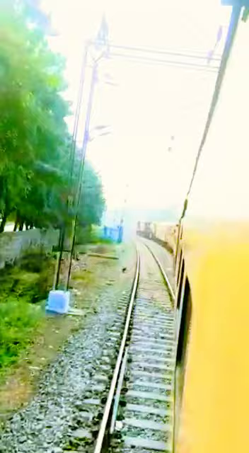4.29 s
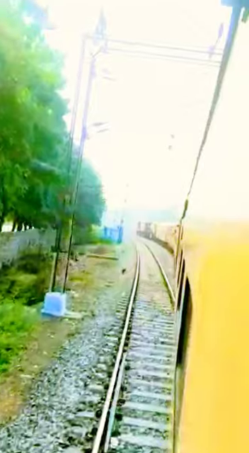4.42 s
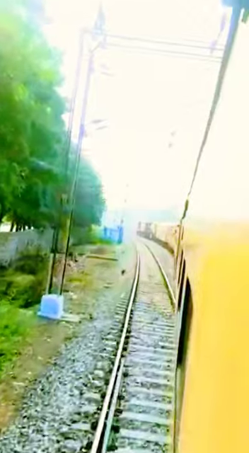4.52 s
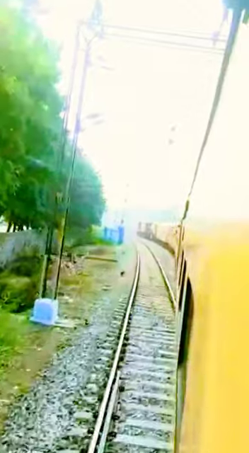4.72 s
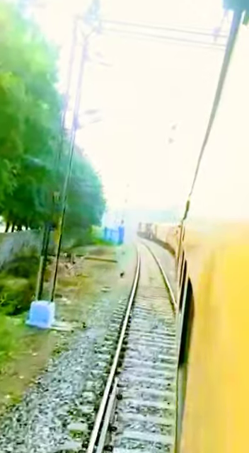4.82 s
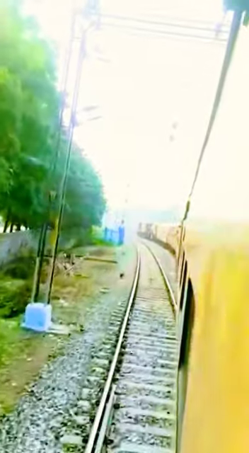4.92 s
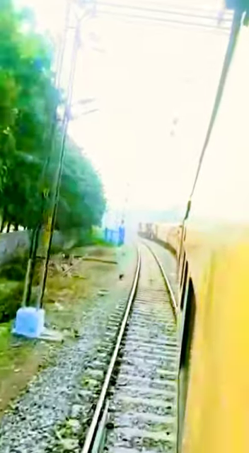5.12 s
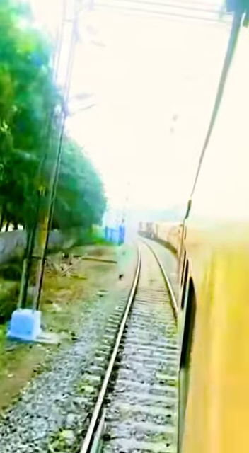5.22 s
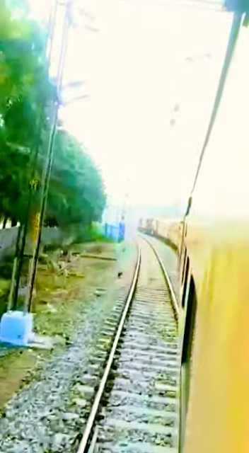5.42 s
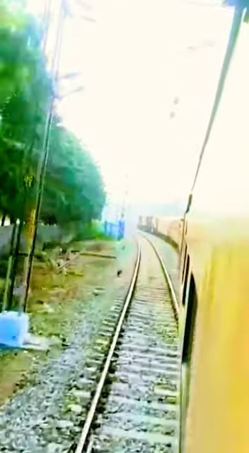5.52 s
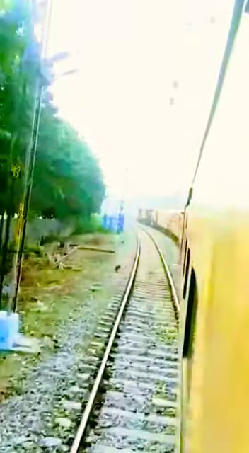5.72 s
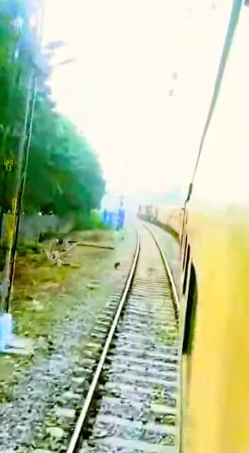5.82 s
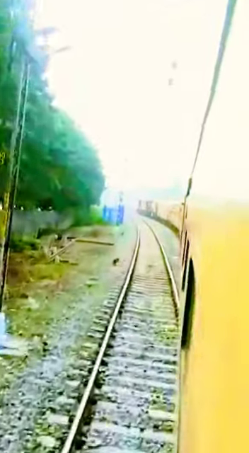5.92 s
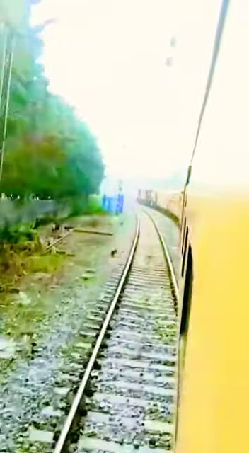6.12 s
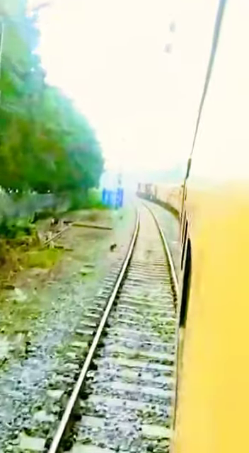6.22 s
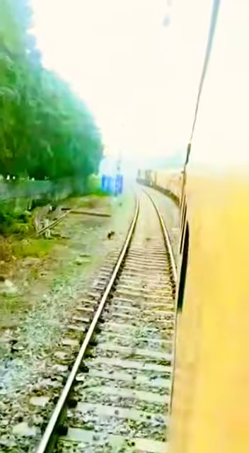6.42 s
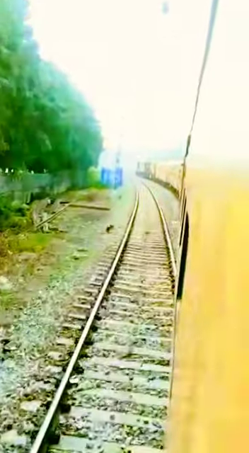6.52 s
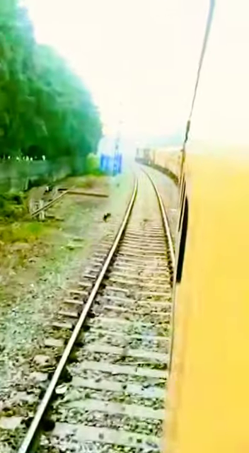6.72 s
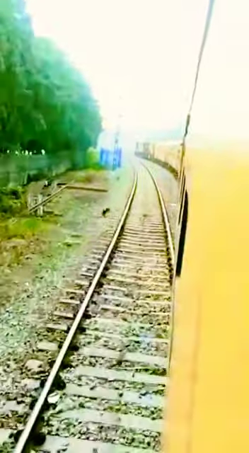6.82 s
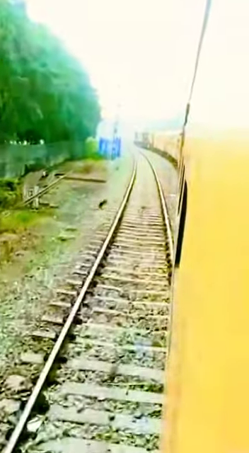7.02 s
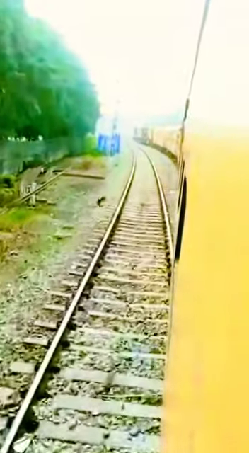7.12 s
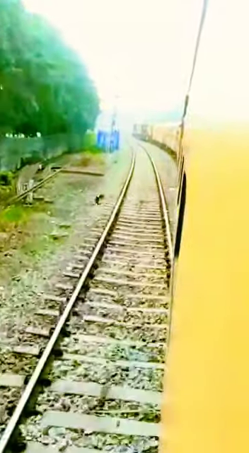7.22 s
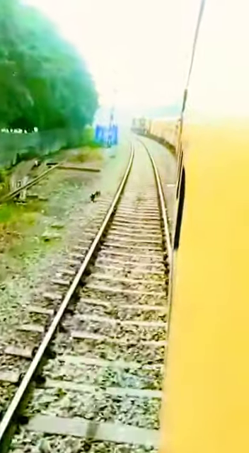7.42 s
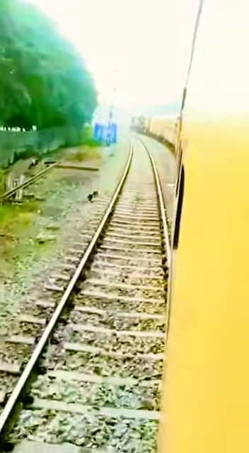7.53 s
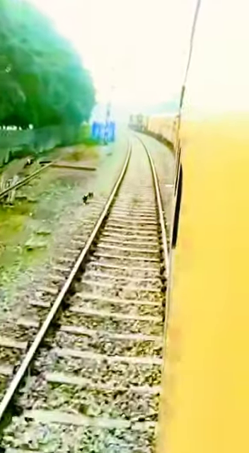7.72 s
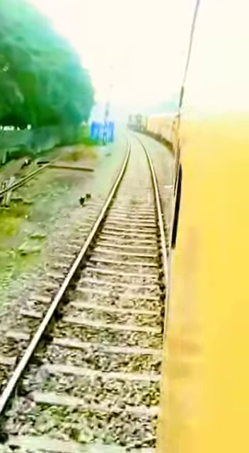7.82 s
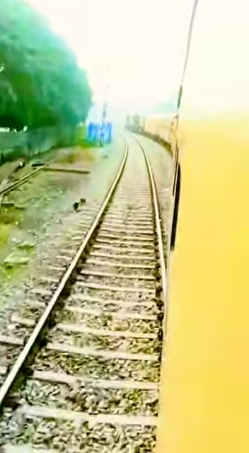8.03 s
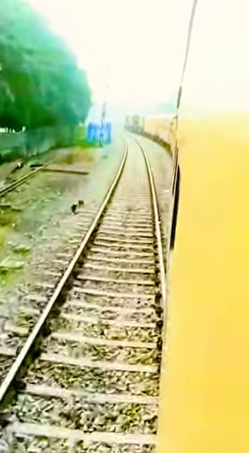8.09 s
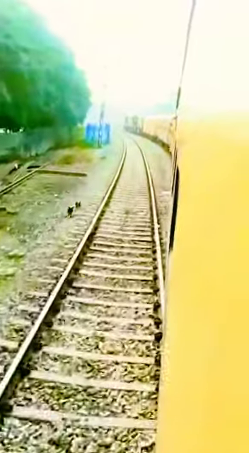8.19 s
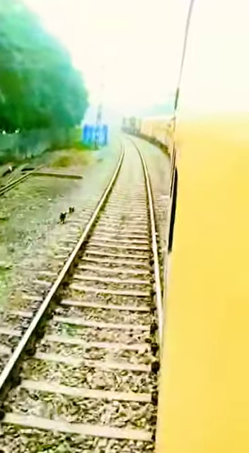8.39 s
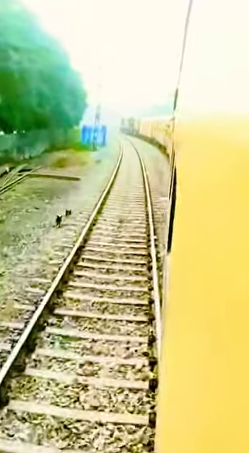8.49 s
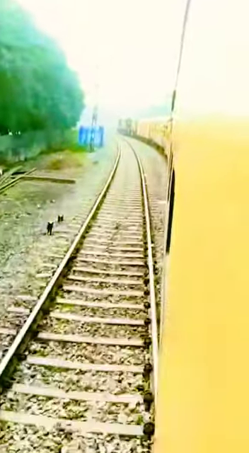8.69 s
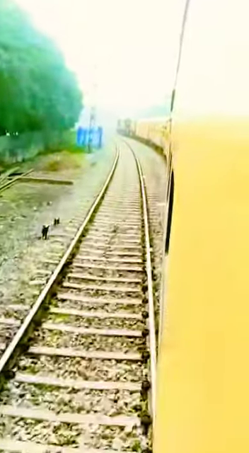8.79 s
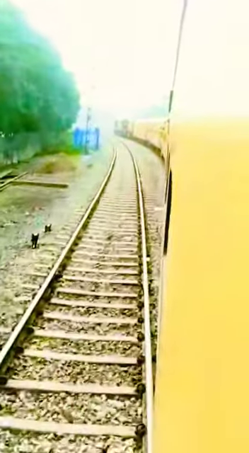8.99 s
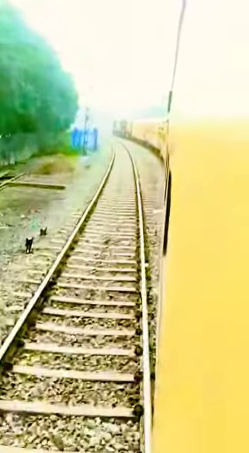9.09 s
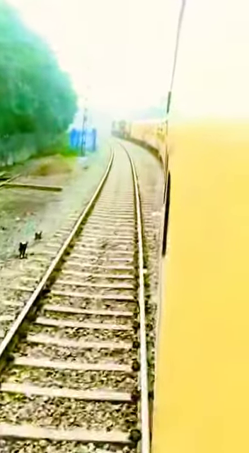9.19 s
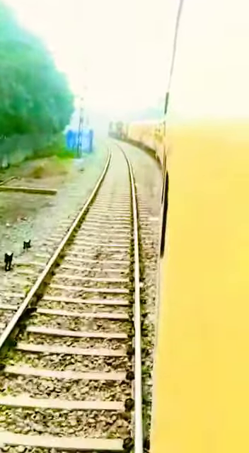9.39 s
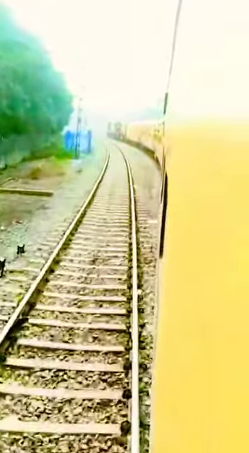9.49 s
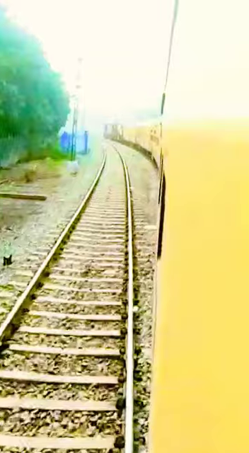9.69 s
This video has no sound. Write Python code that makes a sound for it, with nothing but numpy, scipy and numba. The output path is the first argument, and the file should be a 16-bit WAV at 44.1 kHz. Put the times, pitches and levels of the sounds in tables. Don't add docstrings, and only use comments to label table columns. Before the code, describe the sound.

At the open doorway of a slowly rolling passenger coach, a low, uneven wheel rumble, droning floor panels, mid roar and soft hiss continue throughout. Over them a thin flange squeal near 2 kHz, with overtones, flutters as it grips and slips, beside very faint steady electrical whines. A sharp bang with rattling metal lands at 0.5 s, then scattered knocks at 1.3, 1.7, 2.5, 3.3 and 3.8 s, with dull thuds and tiny scrapes between. Another knock comes at 4.6 s, then a short lull before 5.6 s. From about 6 s the ride roughens: heavy clanks at 6.3, 7.0 and 7.8 s, crowded thuds, chattering and jingling loose parts. Blows continue at 8.4 and 9.0 s, then soften towards 9.7 s as rumble and squeal persist. Close stereo sound, right side duller, hard peaks slightly squashed.

```python
import sys
import numpy as np
from scipy import signal
from scipy.fft import rfft, irfft
from scipy.io import wavfile
from scipy.ndimage import uniform_filter1d
from numba import njit

SR = 44100
rng = np.random.default_rng(int(sys.argv[2]) if len(sys.argv) > 2 else 0)


def wrap_up_sound(samples):
    columns = np.atleast_2d(samples).T
    tamed = np.clip(columns, -1, 1)
    steps = np.round(tamed * 32767).astype(np.int16)
    wavfile.write(sys.argv[1], SR, steps)


def boost(x):
    u = np.asarray(x, float) / 20
    return 10 ** u


N = 429975
HZ = np.fft.rfftfreq(N, 1 / SR)

# start_s, peak_db, boom_re_peak_db, clank_db, t60_s
JOINT_BLOWS = [(0.498, -5, -10.5, -20.5, 0.21), (1.275, -11.5, -0.5, -30, 0.092),
               (1.701, -14.5, -12, -26.5, 0.35), (2.461, -18.5, -22, -29.5, 0.31),
               (3.259, -19.5, -11, -35, 0.12), (3.809, -17.5, -1, -38, 0.2),
               (3.839, -15.5, -15, -30.5, 0.42), (4.573, -11.5, -2.5, -39, 0.11),
               (5.564, -12, -5, -23, 0.16), (6.324, -5.5, -2, -20, 0.16), (6.379, -15.5, -6, -32, 0.38),
               (6.854, -12, -9, -32.5, 0.35), (7.0105, 0, -6.5, -21, 0.17), (7.228, -22, 11, -44, 0.091),
               (7.322, -14, -5, -35, 0.23), (7.407, -17.5, 1, -34, 0.3), (7.502, -17, -5, -34, 0.17),
               (7.556, -10.5, -1, -25, 0.18), (7.774, -4, 2.5, -19.5, 0.15),
               (8.382, -13, 4.5, -25.5, 0.059), (8.749, -33, -8, -47, 0.068), (9.003, -13, -5, -21, 0.13),
               (9.013, -7.5, -5, -26, 0.13), (9.248, -22, -1, -41, 0.16), (2.955, -30, -10, -31, .12)]
# start_s, peak_db, boom_re_peak_db, t60_s
SPRING_THUDS = [(4.35, -30, 0.5, 0.18), (4.46, -38, -1, .15), (5.2, -33, 3, 0.4), (6.14, -26, 1, .2),
                (7.05, -27, 1, 0.1), (0.019, -19, -22, 0.12), (0.391, -25, -12, 0.13),
                (0.535, -11.5, -18, 0.12), (0.57, -38, -2, 0.12), (1.195, -25, 1.5, 0.2),
                (1.3, -11, -19, 0.082), (1.725, -19, -5, .15), (1.74, -22, -12, .15), (2.5, -21, -11, 0.19),
                (4.617, -22, -4, .13), (5.559, -20, 0, .08), (5.595, -17, -5, 0.23), (7.205, -15, 1, .12),
                (7.585, -19, 6.5, 0.078), (8.559, -21, 0, 0.13), (8.649, -29, 3, 0.2),
                (9.04, -18, -3, 0.24), (9.115, -20.5, 3.5, 0.065), (9.205, -22, 1, 0.19),
                (9.547, -33, -3, 0.15), (1.945, -31.5, 5, 0.26), (2.417, -19, -25, 0.16),
                (3.135, -21, 0.5, 0.14), (3.455, -19.5, 0, 0.067), (4.34, -29, -18, 0.21),
                (4.665, -21.5, -3, 0.15), (4.75, -18.5, -7, 0.1), (5.792, -18, -6, 0.25),
                (6.098, -13, -14, 0.09), (6.117, -11, -35, 0.24), (6.28, -23.5, 5, 0.17),
                (6.429, -13, -24, 0.18), (6.463, -10, -12, 0.091), (6.565, -10.5, -11, 0.25),
                (6.651, -15.5, 0.5, 0.16), (6.738, -5.5, 3.5, 0.052), (6.82, -14, -3, 0.043),
                (6.926, -20, -6, 0.41), (7.143, -10.5, 3, 0.26), (7.183, -17, 6, 0.18),
                (7.261, -26, -7, 0.17), (8.092, -14.5, -5, 0.12), (8.123, -18.5, -11, 0.23),
                (8.236, -20, -3, 0.32), (8.41, -19, 7, 0.24), (8.468, -19, 3.5, 0.14),
                (8.831, -25, 0, 0.48), (8.335, -16, -13, 0.3), (9.16, -17, -3, 0.16),
                (9.696, -21.5, -0.5, 0.25)]
# crest_s, level_db, pitch_hz
FLOOR_SWINGS = [(0.5006, -9, 300), (1.281, -8, 268), (3.8142, -10.5, 228), (4.5789, -11.5, 258),
                (5.5607, -14, 190), (5.567, -14, 422), (6.129, -10.5, 286), (6.331, -6, 285),
                (6.7409, -9, 251), (6.8548, -8.5, 340), (7.0102, -2.5, 260), (7.145, -11.5, 280),
                (7.5611, -10.5, 298), (7.778, -3, 240), (7.784, -2, 250), (8.387, -11.5, 246),
                (9.0174, -9.5, 330), (9.0225, -3.5, 199)]
# pitch_hz, level_db, t60_s
FRAME_MODES = [(106, -4, 0.26), (143, -3.5, 0.24), (178, -6, 0.052), (287, -1, 0.2), (414, -6, 0.12),
               (578, -5, 0.1), (800, -9, 0.15)]
# start_s, peak_db, treble_re_peak_db, t60_s, tick_re_chatter_db
THROWN_PARTS = [(0.5028, -21, -6, 0.31, 14), (0.541, -22.5, -3, 0.2, 11), (0.567, -24, 0, 0.14, 1),
                (0.585, -31.5, -1, 0.33, 7), (1.279, -24, -8, 0.05, 0), (1.2845, -21.5, -16, 0.067, 4),
                (1.307, -21.5, -12, 0.055, 3), (1.326, -31, -15, 0.088, 2), (1.712, -29, -6, 0.2, -2),
                (1.735, -34, -5, 0.25, -4), (4.58, -33.5, -7, 0.33, -6), (5.65, -35, 3, 0.4, -6),
                (5.9, -38.5, 6, 0.31, -8), (6.327, -20, -2.5, 0.071, -6), (6.437, -28.5, -20, 0.56, -3),
                (6.569, -30.5, -10, 0.12, 1), (6.63, -40, 2, 0.3, -1), (6.666, -28.5, -6, 0.15, -2),
                (7.0136, -19.5, -14, 0.22, -2), (7.41, -27.5, 0, 0.07, -8), (7.428, -26, -4, 0.15, 0),
                (7.489, -30.5, 0, 0.42, 1), (7.53, -28.5, -17, 0.2, 2.5), (7.7787, -22, 0, 0.13, 14),
                (7.792, -22.5, -3, 0.22, -3), (8.405, -29, -20, 0.19, -6), (8.425, -25, -17, 0.31, -5),
                (9.0205, -28, -10, 0.18, 12)]
# start_s, peak_db, treble_re_peak_db
NUDGED_PARTS = [(0.4773, -33, -10), (1.78, -38, -16), (1.9764, -36, -15), (2.464, -35, -14),
                (2.495, -30, -13), (2.5247, -30, -18), (2.56, -34, -14), (3.9, -33, -10),
                (3.9948, -39, -14), (4.8678, -44, -18), (5.1068, -44, -11), (5.564, -29, -10),
                (5.1736, -49, -8), (3.84, -35, -14), (0.349, -43, -10), (6.895, -27, -17),
                (7.1477, -32, -10), (7.183, -28, 0), (7.338, -28.5, -1), (7.56, -32, -6), (8.285, -39, 4),
                (8.5829, -33, -18), (8.655, -34.5, -15), (9.004, -33, -7), (7.052, -28, -10),
                (9.053, -33, -8)]
# pitch_hz, level_db
LOOSE_MODES = [(2600, -3), (3300, 1), (3900, -2.5), (4600, -7), (5200, -2.5), (6000, 8), (7200, 6),
               (8200, 2.5), (9500, -7), (10600, -19)]
# start_s, length_s, pitch_hz, width_hz, level_db
SCRAPES = [(0.948, .09, 3500, 40, -53), (1.06, .07, 3420, 30, -49), (3.92, .05, 3900, 60, -53),
           (4.12, .08, 3460, 30, -54), (4.55, .06, 3420, 30, -54), (5.66, .06, 3560, 40, -52),
           (5.775, 0.03, 3870, 60, -51), (2.2, .04, 3520, 150, -50), (4.69, 0.05, 3490, 40, -49),
           (5.4, 0.08, 3470, 35, -48), (6.4276, 0.031, 3850, 330, -27.5), (7.988, 0.031, 4300, 200, -43),
           (8.82, .025, 11100, 500, -48), (9.53, 0.087, 7800, 700, -46)]
# centre_s, gain_db
FLANGE_BITES = [(0.524, -1), (0.958, 4.5), (1.307, 4.2), (1.397, 4.2), (1.482, 4), (1.716, 5.9), (1.786, 2),
                (1.891, 4.5), (1.956, 7.5), (2.15, 3.4), (2.24, 1), (2.375, 2), (2.439, 4.5), (2.504, 3),
                (2.604, 3), (2.699, 3.5), (2.829, 4), (3.023, 5.5), (3.103, 2.5), (3.402, 3), (3.557, 2.5),
                (3.761, 4.5), (3.866, 1.8), (4.121, 5), (4.265, 3.5), (4.39, 3), (4.505, 2.5), (4.629, 3),
                (5.233, 2), (5.682, 3), (5.837, 2.2), (5.902, 3), (6.071, 4.5), (6.226, 2.2), (6.346, 2),
                (6.5, 5.6), (6.63, 7.5), (6.79, 2.5), (6.889, 5), (6.994, 5), (7.129, 6.5), (7.263, 6.5),
                (7.518, 6.5), (7.693, 1.9), (7.867, 2), (8.062, 8.5), (8.286, 3), (8.351, 2.5), (8.7, 4),
                (8.945, 2.5), (9.154, 5.2), (9.374, 2.5), (9.538, 6)]
# centre_s, loss_db
FLANGE_SLIPS = [(0.05, 6.7), (0.224, 4.4), (0.384, 4.0), (0.464, 3.0), (0.629, 5.8), (0.728, 4.0),
                (0.813, 5.0), (0.918, 2.2), (1.073, 3.0), (1.157, 6.1), (1.222, 3.1), (1.527, 2.7),
                (1.646, 2.9), (1.836, 3.5), (2.205, 1.8), (2.325, 5.1), (2.559, 3.9), (2.659, 3),
                (2.779, 4.2), (2.928, 1.5), (3.178, 5.4), (3.357, 3.5), (3.457, 1.8), (3.652, 1.7),
                (3.836, 1.4), (3.896, 1.9), (4.016, 5), (4.185, 5.3), (4.32, 4.4), (4.46, 3.4), (4.555, 6),
                (4.719, 3.9), (4.834, 3.5), (4.924, 4.5), (5.024, 7.3), (5.323, 4.4), (5.463, 11),
                (5.612, 2.1), (5.867, 1.6), (5.971, 4.9), (6.156, 4.3), (6.256, 1.6), (6.44, 3.4),
                (6.755, 1.8), (7.378, 5), (7.648, 4.4), (7.832, 1.8), (7.987, 5.8), (8.231, 4.1),
                (8.391, 1.6), (8.471, 4.4), (8.855, 7.9), (8.985, 3.5), (9.069, 4.1), (9.234, 2.2),
                (9.294, 2.1), (9.414, 3.4), (9.653, 4.0)]
# multiple, level_db
SQUEAL_OVERTONES = [(2, -11), (3, -15), (4, -19), (5, -33), (6, -32), (7, -29)]
# pitch_hz, width_hz, level_db
SQUEAL_HALOS = [(4058, 104, -55), (6010, 110, -60.5), (8030, 220, -62)]
# time_s, wheel_load_db, shaking_db
RIDE = [(0.0, 0, 1), (1.5, 0, 1), (1.84, 1, 1), (2.15, -1.5, 0), (2.52, 1.5, 1.5), (2.91, -1, 1),
        (3.28, 1.5, 2), (3.67, -1, 0.5), (4.72, -0.5, 0), (5.05, -1.5, 0.5), (5.43, 1.5, 1.5), (5.81, 1, 4),
        (6.4, 4.5, 5), (7.06, 1.5, 6), (7.5, 4.5, 2), (8.0, -2, 3), (8.36, 2, 1.5), (9.75, -1, 1.5)]
# pitch_hz, density_db_per_hz
RUMBLE_SPECTRUM = [(15, -38), (25, -23), (54, -5), (102, -4), (140, -2.5), (200, -0.5), (252, -3.5),
                   (320, -4), (445, -9.5), (667, -19), (900, -19.5), (1170, -45), (1980, -120)]
# pitch_hz, density_db_per_hz
ROAR_SPECTRUM = [(350, 1.5), (600, 1), (900, 6.5), (1120, 8), (1280, -4.5), (1800, 3), (2400, -2.5)]
# pitch_hz, density_db_per_hz
HISS_SPECTRUM = [(1240, -10), (2100, -13.5), (2380, -12.5), (2450, -10), (2720, -11.5), (4000, -9.5),
                 (4350, -15), (5300, -14.5), (6200, -18), (11600, -23), (12400, -18), (12700, -89),
                 (13900, -29), (14300, -27), (14800, -30), (15500, -82)]
# pitch_hz, width_hz, level_db
DRONING_PANELS = [(60, 23, -50.5), (104, 32, -49.5), (285.5, 21.6, -41.5), (434.8, 51, -45), (536, 50, -54)]
LINE_HZ = [3880, 5690, 5889, 6519, 8734, 8834, 9034, 9134, 9233, 11679, 11879, 11979]
# left_db, right_db
LINE_DB = [(-76, -78), (-72, -65), (-56, -72), (-94, -79), (-74, -79), (-62, -86), (-59, -77), (-68, -65.5),
           (-85, -65), (-57, -104), (-63, -101), (-73, -103)]
# pitch_hz, start_s, gain_db
LINE_SWELL = (9134, 8.25, 5)
# pitch_hz, left_minus_right_db
PORT_BALANCE = [(60, -0.5), (200, 1.5), (380, 4.5), (700, -1), (2000, 4.5), (4400, 0), (7000, 4.5),
                (9000, 7.5), (10500, 47), (13000, 77)]
# pitch_hz, likeness_0_to_1
PORT_LIKENESS = [(60, 0.94), (290, 0.96), (640, 0.61), (1400, 0), (6000, 0.21)]
# pitch_hz, lag_samples
PORT_LAG = [(60, 12), (180, 22), (350, 17.5), (600, 5.5), (1500, 20.7)]


def unit(x):
    return x / np.sqrt(np.mean(x ** 2))


def shape(table, hz):
    points_hz, values = np.array(table).T
    return np.interp(np.log(hz + 1), np.log(points_hz), values)


def curve(table):
    s, *columns = np.transpose(table)
    return [np.interp(np.arange(N) / SR, s, c) for c in columns]


def walk(rate):
    k = int(SR / rate)
    steps = np.repeat(rng.standard_normal(N // k + 1), k)
    return unit(uniform_filter1d(uniform_filter1d(steps, k), k)[:N])


def trail():
    return np.exp(-2j * np.pi * HZ * shape(PORT_LAG, HZ) / SR)


def reach_ports(x, low_hz):
    return irfft(rfft(x) * HZ ** 2 / (HZ ** 2 + low_hz ** 2) * np.array([HZ ** 0, trail()]), N)


def air():
    like = np.clip(shape(PORT_LIKENESS, HZ), 0, 1)
    a, b = rfft(rng.standard_normal((2, N)))
    right = irfft((like * a + np.sqrt(1 - like ** 2) * b) * trail(), N)
    return np.array([irfft(a, N), right])


@njit
def svf(x, hz, width):
    y, b, l = np.empty(len(x)), 0., 0.
    g, k = np.tan(np.pi * hz / SR), width / hz
    for i in range(len(x)):
        v = (b + g * (x[i] - l)) / (1 + g * (g + k))
        b, l, y[i] = 2 * v - b, l + 2 * g * v, k * v
    return y


def band(pair, hz, width):
    hz, width = float(hz), float(width)
    return np.array([svf(svf(x, hz, width), hz, width) for x in pair])


def panel(hz, width, even_s, noise=None):
    ring = band(air() if noise is None else noise, hz, width)
    power = uniform_filter1d(np.mean(ring ** 2, axis=0), int(even_s * SR))
    return ring / np.sqrt(power + 1e-12)


def bursts(s, db, t60, hold, rise):
    env, t = np.zeros(N), np.arange(SR // 2) / SR
    for start, level_db, fall, contact in zip(s, db, t60, hold):
        decay_db = -60 * np.maximum(t - contact, 0) / max(fall, .01)
        blow = boost(level_db + decay_db) * (1 - np.exp(-t / rise))
        i = max(int((start - rise) * SR), 0)
        env[i:i + len(t)] = np.hypot(env[i:i + len(t)], blow[:N - i])
    return env


def knocks():
    thuds = [(s, db, boom, -55 + 0.1 * (db + 20), t60) for s, db, boom, t60 in SPRING_THUDS]
    s, db, boom_db, clank_db, t60 = np.transpose(JOINT_BLOWS + thuds)
    hold = 0.0042 + 0.049 * t60
    s = s + 0.001
    boom = panel(143, 82, even_s=0.039)
    boom = boom * bursts(s, db + boom_db - 3.5, 1.11 * t60, hold, rise=0.0018)
    floor = panel(271, 117, even_s=0.014) + boost(-5) * panel(465, 114, even_s=0.045)
    floor = floor * bursts(s, db - 9.5, t60, hold, rise=0.0042)
    clank = panel(710, 840, even_s=0.0024) + panel(1840, 800, even_s=0.0011)
    return boom + floor, clank * bursts(s, clank_db - 8, 1.92 * t60, hold, rise=0.00049)


def strikes():
    out, t = np.zeros(N + SR), np.arange(SR // 3) / SR
    hz, mode_db, t60 = np.transpose(FRAME_MODES)[:, :, None]
    draws = rng.standard_normal((len(JOINT_BLOWS), 2, len(FRAME_MODES), 1))
    for (s, db, *_), (mix, bend) in zip(JOINT_BLOWS, draws):
        level_db = db - 17 + mode_db + 1.4 * mix - 60 * t / t60
        ring = boost(level_db) * np.sin(2 * np.pi * hz * (1 + 0.027 * bend) * t)
        i = int(s * SR)
        out[i:i + len(t)] += np.sum(ring, axis=0)
    return reach_ports(out[:N], low_hz=75)


def slams():
    rise_s, fall_s, lead = .0014, .005, .85
    t, out, room = np.arange(N) / SR, np.zeros(N), np.ones(N)
    for s, db, hz in FLOOR_SWINGS:
        env = np.exp(-((t - s) / np.where(t < s, rise_s, fall_s)) ** 2)
        out += boost(db) * env * np.cos(2 * np.pi * hz * (t - s))
        room *= 1 - lead * env ** .3
    return reach_ports(out, low_hz=90), room


def rattles():
    jingle_t60_s, jingle_tick_db = 0.15, -1
    nudged = [row + (jingle_t60_s, jingle_tick_db) for row in NUDGED_PARTS]
    s, db, treble_db, t60, tick_db = np.transpose(THROWN_PARTS + nudged)
    hold, tick_t60, same = 0.0028 + 0.085 * t60, np.full(len(s), .014), np.ones(len(s))
    noise, chatter = air(), boost(2 * walk(200))
    mids = bursts(s, db - 9, t60, hold, rise=0.0026)
    highs = bursts(s, db + treble_db - 15, 0.3 * t60, hold, rise=.001)
    mid_ticks = bursts(s, db + tick_db - 14.5, tick_t60, 0.0017 * same, rise=0.00038)
    high_ticks = bursts(s, db + treble_db + tick_db - 5.5, tick_t60, 0.00071 * same, rise=0.00066)
    out = panel(3730, 5060, 0.0025, noise) * (chatter * mids + mid_ticks)
    out += panel(8600, 11400, 0.00031, noise) * (chatter * highs + high_ticks)
    shake_db = curve(RIDE)[1]
    out += panel(6600, 6000, .01, noise) * chatter * boost(6.7 * (shake_db - 5.5) - 47.5)
    for hz, part_db in LOOSE_MODES:
        turn = boost(part_db - 18 + 14 * np.tanh(walk(130)))
        out += panel(hz, 560, 0.0026, noise) * turn * (mids if hz < 5600 else highs)
    for start, length, hz, width, level_db in SCRAPES:
        env = bursts([start], [level_db], [.045], [length], rise=0.0037)
        out += panel(hz, width, 0.015, noise) * chatter * env
    return out


def grip_db():
    t = np.arange(N) / SR

    def bells(rows, width_s=0.027):
        return sum(db * np.exp(-((t - s) / width_s) ** 2) for s, db in rows)

    return -41.5 + bells(FLANGE_BITES) - bells(FLANGE_SLIPS)


def squeal():
    pitch_hz = 2018.3
    note, overtones = boost(-4) * panel(pitch_hz + 6, 45.5, even_s=0.3), np.zeros((2, N))
    for wander_hz, wheel_db in [(3, -2.5), (14, -4.5)]:
        phase = 2 * np.pi * np.cumsum(pitch_hz + wander_hz * walk(30)) / SR
        for port, late in enumerate((0, 2.03 + 1.22 * walk(7))):
            note[port] += boost(wheel_db + 1.55 * walk(25)) * np.sin(phase - late)
            for k, db in SQUEAL_OVERTONES:
                level = boost(wheel_db + db + 3 + 1.6 * walk(35))
                overtones[port] += level * np.sin(k * phase - 0.56 * late)
    power = uniform_filter1d(np.mean(note, axis=0) ** 2, int(.022 * SR))
    steady = note / np.sqrt(power + 0.02)
    return steady * boost(grip_db() + 2.5) + overtones * boost(-42.5)


def halos():
    noise = air()
    return sum(panel(hz, width, .05, noise) * boost(db + 1.5 * walk(9.2)) for hz, width, db in SQUEAL_HALOS)


def bed(colour, swell_db, flicker_db, rate):
    low_hz, high_hz = colour[0][0], colour[-1][0]
    noise, out, swell = rfft(air()), 0, walk(rate)
    noise = noise * boost(shape(colour, HZ)) * (HZ > low_hz / 2) * (HZ < high_hz)
    for hz in 2 ** np.arange(np.log2(low_hz), np.log2(high_hz) + .5, .5):
        window = np.clip(1 - 2 * abs(np.log2((HZ + 1) / hz)), 0, 1)
        out = out + irfft(noise * window, N) * boost(swell_db * swell + flicker_db * walk(2 * rate))
    return unit(out)


def rolling():
    load_db, shake_db = curve(RIDE)
    rumble = bed(RUMBLE_SPECTRUM, swell_db=-0.38, flicker_db=3, rate=12) * boost(-31.5 + load_db)
    roar = bed(ROAR_SPECTRUM, swell_db=1.5, flicker_db=2.1, rate=9.1)
    roar = roar * boost(-41 + 0.15 * load_db - 0.75 * shake_db)
    hiss = bed(HISS_SPECTRUM, swell_db=.5, flicker_db=1, rate=10) * boost(-43 + shake_db)
    return rumble + roar + hiss


def drone():
    load_db = curve(RIDE)[0]
    return sum(panel(hz, width, even_s=0.17) * boost(db + 0.84 * load_db + 0.83 * walk(5.4))
               for hz, width, db in DRONING_PANELS)


def whine():
    t, out = np.arange(N) / SR, np.zeros((2, N))
    swell_hz, swell_s, gain_db = LINE_SWELL
    swell_db = gain_db * np.clip((t - swell_s) / .2, 0, 1)
    sag_db = -6 * np.clip((t - 4.1) / .3, 0, 1)
    for hz, db in zip(LINE_HZ, LINE_DB):
        tone = np.sin(2 * np.pi * hz * t + walk(3.6))
        level_db = np.array(db)[:, None] + 3 * walk(6.3)
        out += tone * boost(level_db + sag_db * (hz > 11000) + swell_db * (hz == swell_hz))
    return out


def scene():
    balance_db = shape(PORT_BALANCE, HZ)
    tilt = boost(np.array([[.5], [-.5]]) * np.minimum(balance_db, [[8], [60]]))
    tilt[1] *= boost(-.5 * np.maximum(balance_db - 8, 0))
    knock, clank = knocks()
    swing, room = slams()
    blows = (knock + strikes()) * room + swing + clank
    mix = blows + rattles() + squeal() + halos() + rolling() + drone()
    return irfft(rfft(mix) * tilt, N) + whine()


def holes(x):
    hz, _, cells = signal.stft(x, SR, nperseg=1024)
    power = np.abs(np.mean(cells, axis=0, keepdims=True)) ** 2
    patch = uniform_filter1d(uniform_filter1d(power, size=4, axis=1), size=3, axis=2)
    log_patch = np.log(patch + 1e-20)
    around = np.exp(uniform_filter1d(uniform_filter1d(log_patch, size=25, axis=1), size=9, axis=2))
    share = .36 * (1 + .25 * (abs(hz[:, None] - 7000) < 600))
    weak = (patch < share * around) & (hz[:, None] > 2650)
    return signal.istft(cells * np.where(weak, boost(-13), 1), SR, nperseg=1024)[1][:, :N]


def roll_off(x):
    return signal.sosfilt(signal.butter(12, 16440, fs=SR, output="sos"), x)


def record(dry):
    top_hz, sliver_hz, fringe_hz = 12000, 13900, 14350
    spectrum = rfft(np.tanh(0.65 * dry) / 0.75)
    body = irfft(spectrum * (HZ < top_hz), N)
    sliver = irfft(spectrum * (HZ > sliver_hz) * (HZ < fringe_hz), N)
    rough = np.clip(curve(RIDE)[1] - 1.5, 0, 1)
    for lo, hi, bias in [(fringe_hz, 14650, .6), (14650, 15000, -.3)]:
        gate = np.clip(2 * (walk(9) + walk(30) + bias - 2 * rough), 0, 1)
        sliver += irfft(spectrum * (HZ > lo) * (HZ < hi), N) * gate
    top = irfft(spectrum * (HZ >= top_hz) * boost(-(HZ - top_hz) / 250), N)
    quiet = uniform_filter1d(np.mean(body ** 2, axis=0), 1024) < boost(2 * -22)
    crack = uniform_filter1d(top[0] ** 2, 256) > boost(2 * -36)
    kept = holes(body) + sliver * uniform_filter1d(1. * quiet, 256)
    kept += top * uniform_filter1d(1. * crack, 128)
    return roll_off(kept)


dry = scene()
out = record(dry)
wrap_up_sound(out)
```